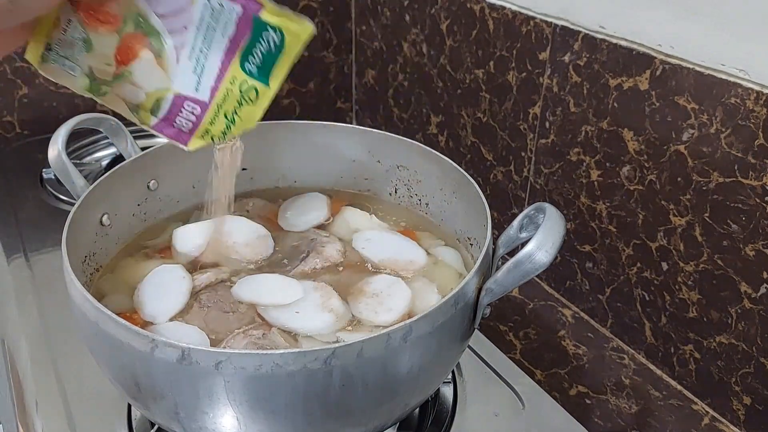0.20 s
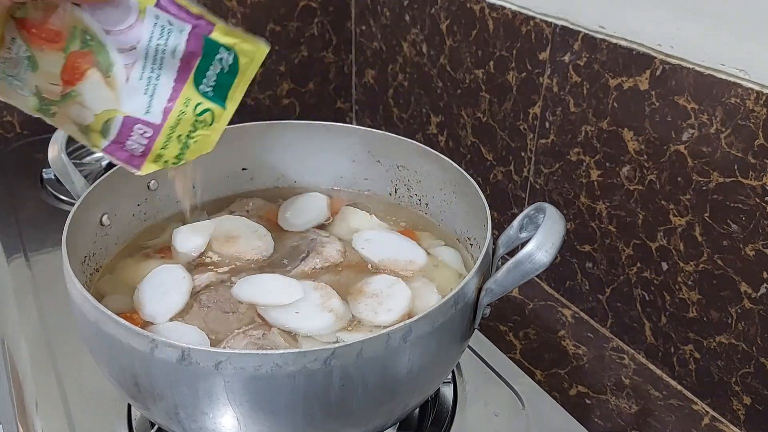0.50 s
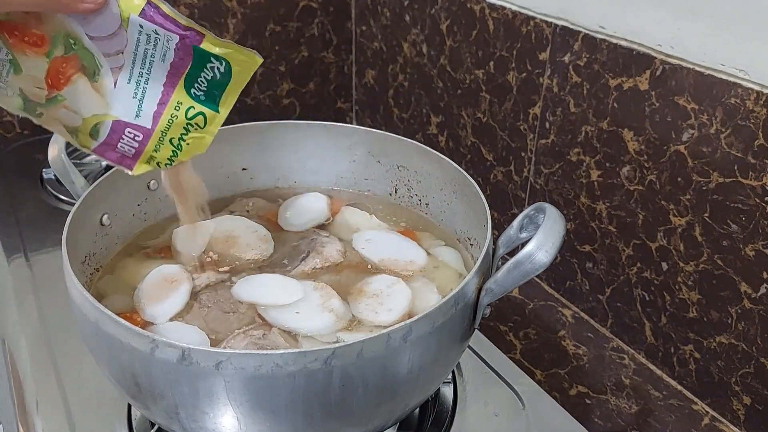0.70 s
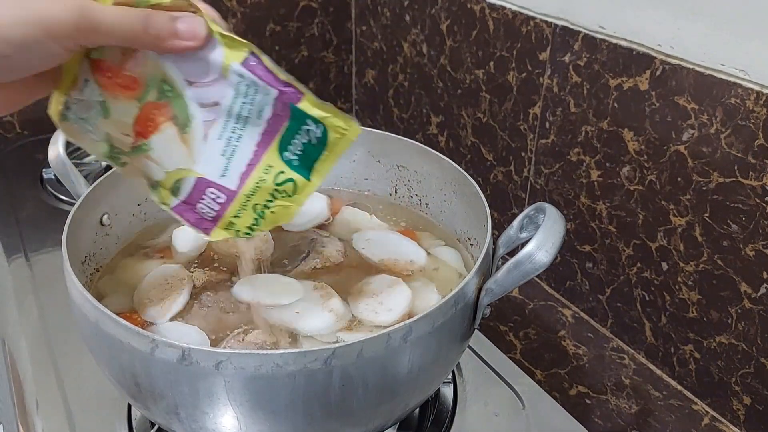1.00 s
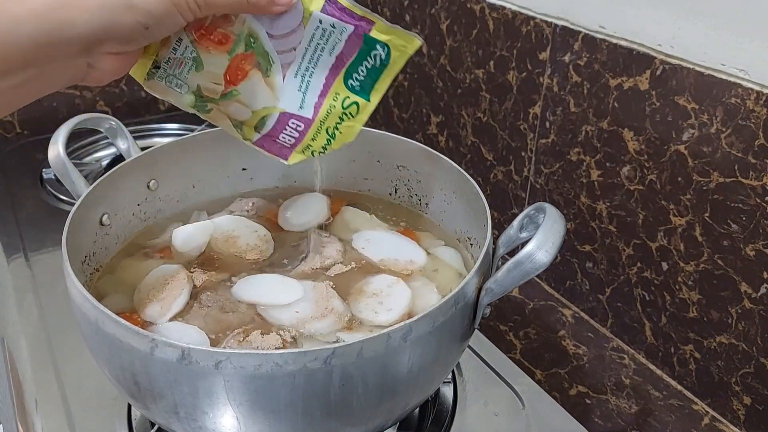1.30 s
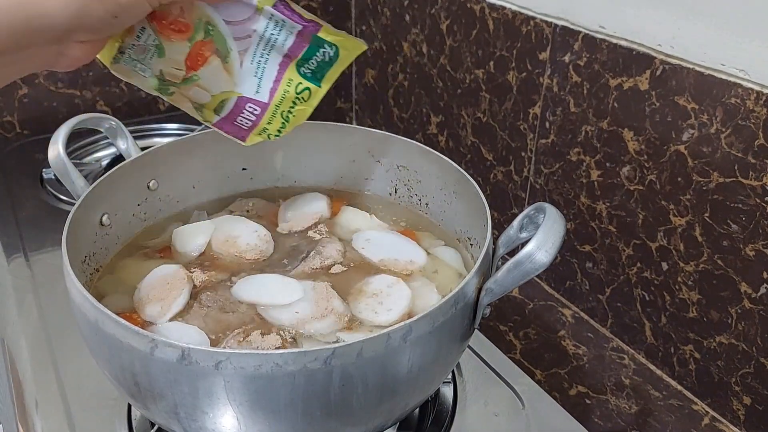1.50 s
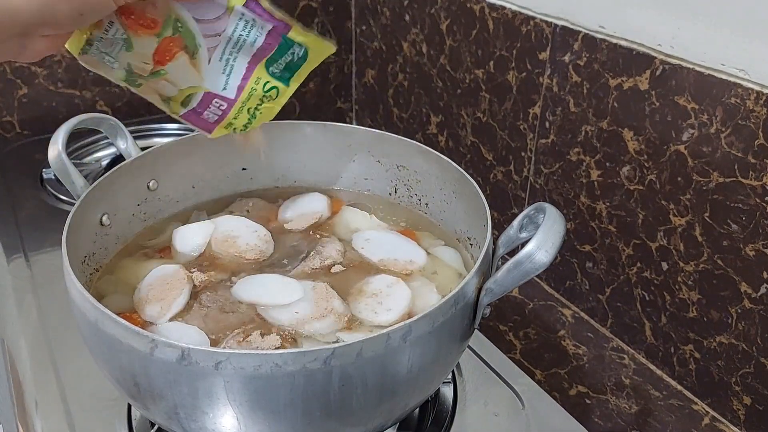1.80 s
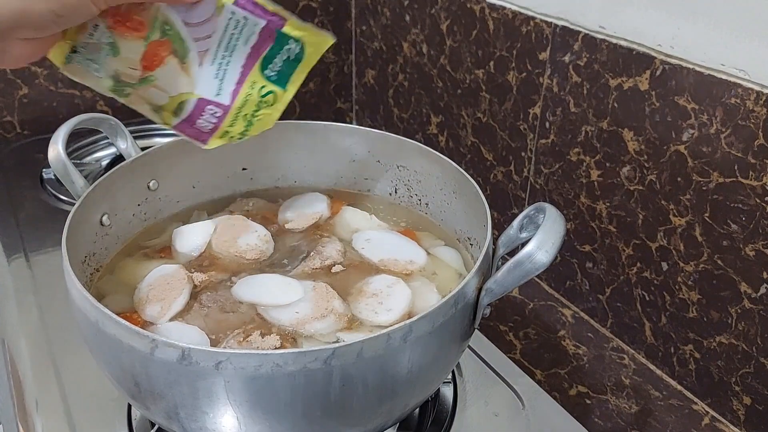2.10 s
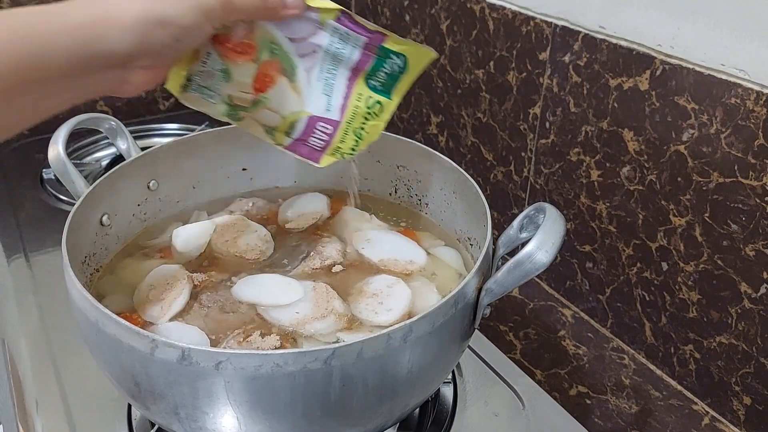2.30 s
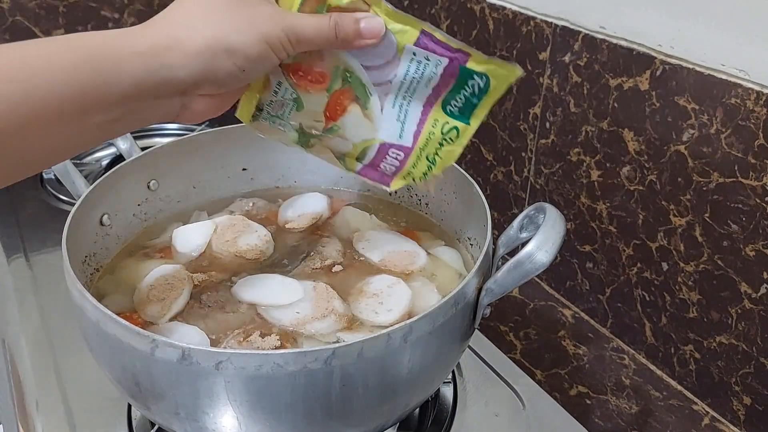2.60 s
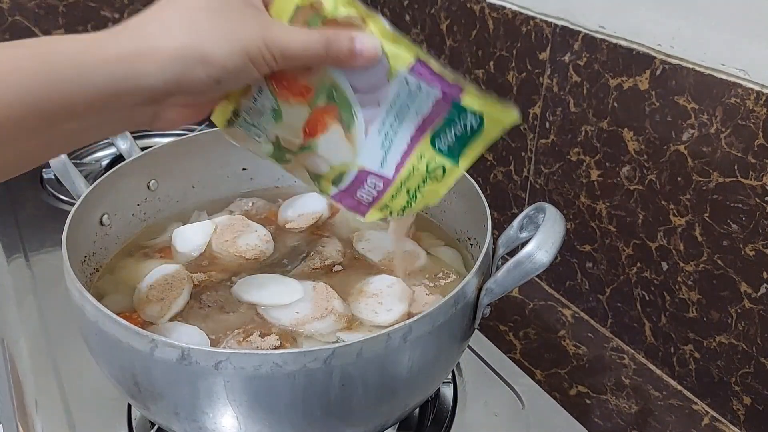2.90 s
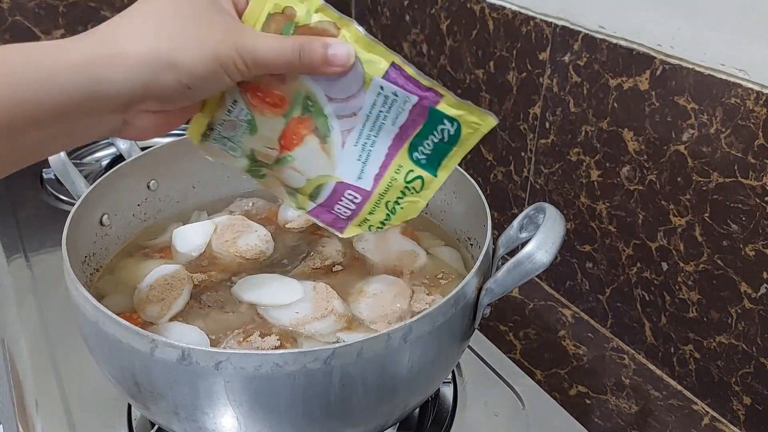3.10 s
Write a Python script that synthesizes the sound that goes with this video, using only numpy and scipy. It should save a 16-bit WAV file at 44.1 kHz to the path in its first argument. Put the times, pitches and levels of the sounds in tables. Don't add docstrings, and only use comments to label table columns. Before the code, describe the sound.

Foil pouch crackling sharply as it is shaken about five times a second, powder grains hissing inside.

```python
import sys
import numpy as np
from scipy import signal
from scipy.fft import rfft, irfft
from scipy.io import wavfile
from scipy.ndimage import uniform_filter1d

SR = 44100
rng = np.random.default_rng(int(sys.argv[2]) if len(sys.argv) > 2 else 0)


def undo_db(level):
    steps = np.asarray(level, float) / 20
    return 10 ** steps


def transcribe(signal):
    frames = np.atleast_2d(signal).T
    limited = np.clip(frames, -1, 1)
    pcm = np.round(limited * 32767).astype(np.int16)
    wavfile.write(sys.argv[1], SR, pcm)


N = 141120
POUCH_PAN_DB = 6

# time in seconds, lag of the right port in microseconds.
PORT_LAG = [
    (0, 225.3),
    (3.2, 109.5),
]


def evened(x):
    return x / np.sqrt(np.mean(x ** 2) + 1e-20)


def read(points, hz):
    f, value = np.transpose(points)
    return np.interp(np.log(hz + 1), np.log(f + 1), value)


def over_time(points, s):
    return np.interp(s, *np.transpose(points))


def add(mix, s, sound):
    part = mix[:, round(s * SR):][:, :sound.shape[1]]
    part += sound[:, :part.shape[1]]


def hum():
    # frequency in Hz, level in dB per Hz.
    hum_colour = [(12, -26), (20, -24), (96, -7.5), (216, -14), (270, -9), (542, -30.5), (590, -33.5),
                  (11100, -29.5), (16000, -24.5)]
    # frequency in Hz, left minus right in dB.
    hum_side = [(60, 13.5), (240, 6), (950, 10.5), (3770, -3), (15000, 0)]
    level_db, waver_db = -67.5, 0.75
    hz = np.fft.rfftfreq(N, 1 / SR)
    side = read(hum_side, hz) / 2 * np.array([[1], [-1]])
    uneven = uniform_filter1d(rng.standard_normal(N), size=2000)
    uneven = evened(uniform_filter1d(uneven, size=2000))
    noise = rfft(rng.standard_normal((2, N)))
    coloured = irfft(noise * undo_db(read(hum_colour, hz) + side), N)
    return undo_db(level_db + waver_db * uneven) * evened(coloured)


def echoes():
    # frequency in Hz, time to fall 60 dB in seconds.
    band_t60 = [(250, 0.24), (660, 0.33), (1740, 0.32), (4590, 0.28), (12100, 0.22)]
    tail_db, near_db, near_decay_s = -1.5, -7, 0.004
    length = SR // 2
    taps = np.zeros((2, length))
    at = np.arange(200, length - 20, 10)
    at = at + rng.integers(0, 10, (2, len(at)))
    np.put_along_axis(taps, at, rng.choice([-1., 1.], at.shape), 1)
    hz, t, z = signal.stft(taps, SR, nperseg=256)
    dying = z * undo_db(-60 * t / read(band_t60, hz)[:, None])
    tail = signal.istft(dying, SR, nperseg=256)[1][:, :length]
    near = rng.standard_normal(tail.shape) * (rng.random(tail.shape) < 0.15)
    near = near * np.exp(-np.arange(length) / SR / near_decay_s)
    tail = undo_db(tail_db) * tail / np.linalg.norm(tail[0])
    return tail + undo_db(near_db) * near / np.linalg.norm(near, axis=1)[:, None]


def kitchen(x, count=6):
    shifts_per_s = 14.0
    place = np.arange(N) / SR * shifts_per_s + count / 2
    wet = np.zeros((2, N))
    for k in range(count):
        distance = abs((place - k) % count - count / 2)
        fade = np.cos(np.pi / 2 * np.minimum(distance, 1))
        wet += signal.fftconvolve(x * fade, echoes(), axes=1)[:, :N]
    return wet


def swell(length, rising):
    steepness = 0.8
    u = np.arange(7000) / SR / min(length, 0.15)
    return np.clip(np.where(u < rising, u / rising, (1 - u) / (1 - rising)), 0, 1) ** steepness


def resonate(x, hz, width):
    turn = np.exp(2j * np.pi * hz * np.arange(len(x)) / SR)
    r = np.exp(-np.pi * width / SR)
    return 2 * (turn * signal.lfilter([1 - r], [1, -r], x / turn)).real


def boom(start, length, level_db, thud_db):
    pouch_hz, pouch_t60_s, wander_hz, thud_hz = 244.6, 0.23, 9.6, 119
    t, push = np.arange(14000) / SR, rng.standard_normal((2, 14000))
    envelope = signal.fftconvolve(swell(length, 0.17), undo_db(-60 * t[:7001] / pouch_t60_s))
    hz = pouch_hz + wander_hz * evened(uniform_filter1d(push[0], 900))
    flutter = undo_db(1.5 * evened(uniform_filter1d(push[0, ::-1], size=500)))
    tone = flutter * np.sin(2 * np.pi * np.cumsum(hz) / SR)
    thud = evened(resonate(resonate(push[1], thud_hz, 31), thud_hz, 54))
    sound = envelope / envelope.max() * (tone + undo_db(thud_db) * thud)
    return sound * undo_db(level_db + POUCH_PAN_DB * np.array([[0.5], [-0.5]]))


def foil(x, s, tilt_db, size=8192):
    # frequency in Hz, level in dB per Hz.
    foil_colour = [(200, -16), (320, -7.5), (1000, -4), (2500, -1), (5000, -0.9), (9000, 0), (12000, 4.23),
                   (15700, -4.5)]
    # frequency in Hz, sharpness, level in dB.
    panels = [(926, 6.5, 4.5), (1204, 6.1, 1.5), (1930, 3.65, 3), (3000, 2.17, 2), (4750, 5.7, 3.5),
              (7430, 8, 3.5)]
    # time in seconds, low-end level in dB.
    fullness = [(.25, -5.5), (.42, -6.5), (.6, 4.5), (.95, -2), (1.12, 9.5), (1.23, 1.5), (1.35, 2),
                (1.63, 0), (1.82, 8.5), (2.16, 9), (2.25, -7.5), (2.4, 5), (2.6, 7), (2.8, -1)]
    # time in seconds, left minus right in dB.
    balance = [
        (0, .3),
        (3.2, -2.2),
    ]
    crumple_db, crumple_hz, belly_hz = 1.01, 150, 774
    hz = np.fft.rfftfreq(size, 1 / SR)
    lumps = evened(np.interp(hz, np.arange(400) ** 1.3 * crumple_hz, rng.standard_normal(400)))
    db = read(foil_colour, hz) + tilt_db * np.log2((hz + 300) / 4000)
    db = np.maximum(db + crumple_db * lumps * (1 + 1500 / (hz + 1000)), -60)
    for panel_hz, sharpness, panel_db in panels:
        db = db + panel_db * np.exp(-(sharpness * np.log((hz + 1) / panel_hz)) ** 2)
    db = db + over_time(fullness, s) / (1 + (hz / belly_hz) ** 4)
    db = db - 30 * np.maximum(1 - hz / 200, 0)
    log = np.log(undo_db(db))
    response = np.exp(np.conj(signal.hilbert(np.r_[log, log[-2:0:-1]])))[:len(hz)]
    response /= np.sqrt(np.mean(abs(response) ** 2))
    lag = over_time(PORT_LAG, s) * 1e-6
    pan = over_time(balance, s) / 2 + POUCH_PAN_DB / 2 / (1 + (2 * hz / belly_hz) ** 2)
    ports = np.array([undo_db(pan), undo_db(-pan) * np.exp(-2j * np.pi * hz * lag)])
    return irfft(rfft(x, size) * response * ports, size)


def ring(s, hz, db, t60, count=5):
    spread = 0.127
    detune = rng.uniform(-0.97, 1, (count, 1))
    lag = np.array([0, over_time(PORT_LAG, s) * 1e-6])[:, None]
    t = np.maximum(np.arange(4000) / SR - lag, 0)
    modes = np.sin(2 * np.pi * hz * (1 + spread * detune) * t[:, None]).sum(1) / np.sqrt(count)
    bend = (1 - np.exp(-2 * hz * t)) * undo_db(db - 60 * t / t60) * modes
    return np.diff(bend, 2) / (2 * np.sin(np.pi * hz / SR)) ** 2


def snap(s, peak_db, tilt_db, rattle_s):
    rise_s, crack_s, rattle_db, lift_db = 0.000846, 0.00022, 5.5, 5
    t, noise = np.arange(1500) / SR, rng.standard_normal((3, 1500))
    late = np.maximum(t - rise_s, 0)
    crack = np.exp(-late / crack_s) * noise[0]
    rattle = undo_db(rattle_db) * np.exp(-late / rattle_s) * (noise[0] + noise[1:]) / np.sqrt(2)
    z = rfft(np.minimum(t / rise_s, 1) ** 2 * (crack + rattle), 4096)
    even = uniform_filter1d(abs(z) ** 2, size=30)
    pop = foil(irfft(z / np.sqrt(even))[:, :2048], s, tilt_db)
    return undo_db(peak_db + lift_db) * pop / abs(pop).max()


def rush(start, length, level_db, tilt_db, rising):
    ticks_per_s, spread_db = 4500, 4.5
    own = 0.71
    sign, size, chance = rng.standard_normal((3, 7000)), rng.exponential(1, (3, 7000)), rng.random((3, 7000))
    ticks = sign * undo_db(spread_db * np.minimum(size, 3))
    ticks = evened(ticks * (chance < ticks_per_s / SR))
    heard = np.sqrt(1 - own) * ticks[0] + np.sqrt(own) * ticks[1:]
    return undo_db(level_db) * foil(swell(length, rising) * heard, start, tilt_db)


def scene():
    # start in seconds, length in seconds, level in dB, thud in dB.
    booms = [(0.22, 0.068, -67, -12), (0.436, 0.049, -48, -21), (0.496, 0.07, -67, -3.5),
             (0.661, 0.046, -66.5, 0.5), (0.914, 0.024, -59, -6), (0.959, 0.066, -55.5, -11),
             (1.119, 0.042, -69, -4), (1.395, 0.098, -60, -8.5), (1.588, 0.04, -51, -30),
             (1.763, 0.081, -58, -15), (1.959, 0.082, -56.5, -14), (2.168, 0.046, -51.5, -12),
             (2.371, 0.057, -67.5, 3.5), (2.608, 0.036, -85, -18), (2.826, 0.048, -67, 4.5)]
    # start in seconds, pitch in Hz, level in dB, time to fall 60 dB in seconds.
    patch_rings = [(0.226, 1890, -44, .04), (0.243, 1450, -45.5, 0.033), (.683, 950, -45, 0.034),
                   (.915, 687, -49.5, 0.035), (.945, 809, -44.5, 0.063), (0.977, 4820, -37, 0.034),
                   (1.114, 1875, -39, 0.059), (1.227, 1010, -40.5, 0.019), (1.379, 561, -47.5, 0.11),
                   (1.379, 6840, -30, 0.018), (1.412, 2660, -37.5, 0.023), (1.486, 2280, -43, 0.023),
                   (1.577, 1420, -43.5, 0.15), (1.615, 4760, -37, .03), (1.614, 627, -50, 0.044),
                   (1.814, 3620, -33, 0.036), (1.954, 820, -62, 0.023), (1.978, 2270, -61, 0.056),
                   (2.2395, 990, -27.5, 0.0066), (2.238, 6510, -28.5, 0.02), (2.245, 3000, -44, 0.018),
                   (2.386, 1045, -45, 0.11), (2.436, 895, -45.5, 0.024), (2.614, 2280, -36.5, 0.024),
                   (2.615, 4500, -36, 0.024), (2.618, 410, -49, 0.022), (2.842, 1010, -41.5, .04),
                   (2.841, 7660, -38, 0.027), (3.101, 1200, -66, .02), (3.143, 2050, -57, 0.034)]
    # time in seconds, peak in dB, tilt in dB per octave, rattle in seconds.
    snaps = [(0.226, -33, -2, 0.00078), (0.242, -34, 2, 0.0062), (0.4, -52, 2, 0.0042),
             (0.422, -39.5, -5, 0.002), (0.448, -33.5, -1.5, 0.0058), (0.585, -41.5, -2, 0.0044),
             (0.61, -30.5, -1, 0.0045), (0.683, -29.5, -0.5, 0.0055), (0.87, -43, -1.5, 0.0038),
             (0.915, -30.5, -2, 0.0045), (0.979, -23, -1.5, 0.0044), (1.113, -25.5, 5, 0.0029),
             (1.227, -22.5, 0, 0.003), (1.33, -36.5, -2, 0.0018), (1.379, -22, -1, 0.0025),
             (1.415, -26.5, 2, 0.0048), (1.487, -36.5, -3, 0.0078), (1.552, -34.5, -1.5, 0.0031),
             (1.613, -26.5, -1, 0.0051), (1.752, -48, -8.5, 0.0015), (1.814, -28, 1.5, 0.0065),
             (1.953, -31, 2.5, 0.0039), (2.154, -64, -23, 0.0036), (2.205, -30.5, -2.5, 0.0033),
             (2.2394, -17, -0.5, 0.00099), (2.575, -35, -0.5, 0.0062), (2.614, -21.5, 2, 0.0045),
             (2.789, -36, 1, 0.0046), (2.841, -19, 1.5, 0.0035), (3.143, -45, -3, 0.003),
             (.487, -37.5, -7, 0.0031), (0.946, -36, 1, .003), (1.391, -40, -1, 0.0023),
             (1.574, -34, 1, .005), (1.765, -42, -5.5, 0.0053), (1.781, -28.5, -0.5, 0.0033),
             (1.978, -46, 4, 0.0023), (2.185, -40.5, -3, .005), (2.378, -42, 11, .005),
             (2.386, -36.5, -3.5, 0.0053), (3.083, -45, 9, 0.0026), (3.101, -49, 0, 0.0034)]
    # start in seconds, length in seconds, level in dB,
    # tilt in dB per octave, rising share of the length.
    shakes = [(.125, 0.059, -58.5, -0.3, 0.81), (0.208, 0.065, -45.5, -2, 0.58),
              (0.406, 0.082, -46, -3.5, 0.39), (0.441, 0.035, -43.5, -4.5, 0.29),
              (0.466, 0.064, -39.5, 1.1, 0.36), (0.584, 0.1, -46.5, 0.5, 0.15),
              (0.604, 0.056, -38, -0.5, 0.6), (0.688, 0.11, -54, -1, 0.16), (0.875, 0.06, -57.5, -3.5, 0.1),
              (0.919, 0.063, -40.5, -1.8, 0.62), (1.109, 0.048, -33, 1.26, 0.61),
              (1.324, 0.25, -48, -4, 0.13), (1.389, 0.031, -53, -8.5, 0.3), (1.548, 0.06, -36, -0.3, 0.69),
              (1.603, 0.032, -38, 2.5, 0.7), (1.739, 0.087, -42, -1.7, 0.7), (1.808, 0.03, -50.5, -4, 0.94),
              (1.952, 0.064, -34, 1.24, 0.58), (2.15, 0.065, -45, -1.6, 0.17),
              (2.177, 0.03, -39, -0.7, 0.72), (2.366, 0.075, -32.5, 1.9, 0.36),
              (2.578, 0.043, -44, -3.5, 0.8), (2.608, 0.031, -37, -2.2, 0.38)]
    # start in seconds, length in seconds, level
    # in dB, # tilt in dB per octave, rising share of the length.
    more_shakes = [(0.768, 0.2, -66.5, 2, 0.29), (1.044, 0.14, -57, -4, 0.08), (1.238, 0.056, -49, 2, 0.21),
                   (1.486, 0.16, -61, -1.5, .3), (1.92, 0.055, -56.5, -2.5, 0.47),
                   (2.064, 0.044, -54, 0.7, 0.58), (2.344, 0.029, -48.5, -2.5, 0.25),
                   (2.553, 0.031, -56, 4, 0.8), (2.739, 0.13, -53.5, -3, 0.39), (2.828, 0.016, -40, 9, 0.57),
                   (2.853, 0.067, -43, -0.1, 0.21), (2.946, 0.15, -61, 0.5, 0.28), (3.027, 0.054, -65, -2, .5),
                   (3.074, 0.065, -57.5, -1.5, 0.23), (3.127, 0.082, -58, 0.3, 0.33)]
    powder, creases, rest = np.zeros((2, N)), np.zeros((2, N)), hum()
    for row in booms:
        add(rest, row[0], boom(*row))
    for row in patch_rings:
        add(creases, row[0], ring(*row))
    for row in snaps:
        add(creases, row[0], snap(*row))
    for row in list(shakes) + list(more_shakes):
        add(powder, row[0], rush(*row))
    to_room = powder + undo_db(-2.5) * creases
    return powder + creases + kitchen(to_room) + rest


def top_cut(x):
    return signal.sosfilt(signal.butter(12, 16550, fs=SR, output="sos"), x)


def record(dry):
    dip_hz, dip_width_hz, dip_db = 8600, 550, -5
    edge_hz, edge_db = 15800, -24
    hz = np.fft.rfftfreq(N, 1 / SR)
    dip = dip_db * np.exp(-((hz - dip_hz) / dip_width_hz) ** 2)
    edge = edge_db * np.clip((hz - edge_hz) / 200, 0, 1)
    shaded = irfft(rfft(dry) * undo_db(dip + edge), N)
    return top_cut(shaded)


dry = scene()
out = record(dry)
transcribe(out)
```